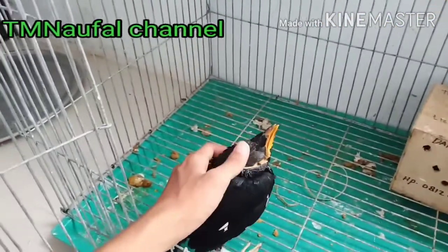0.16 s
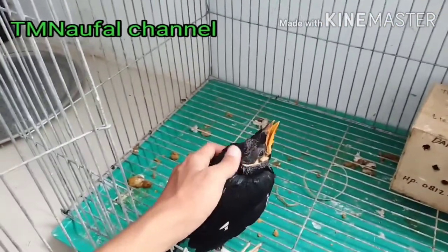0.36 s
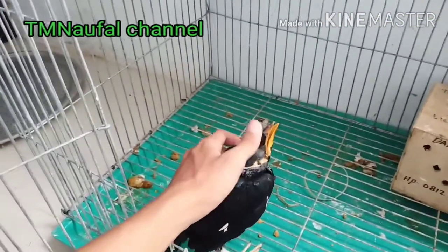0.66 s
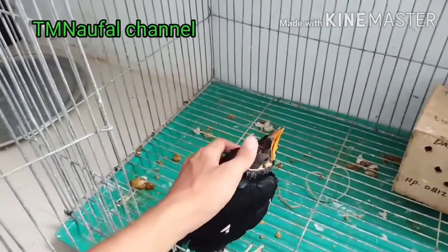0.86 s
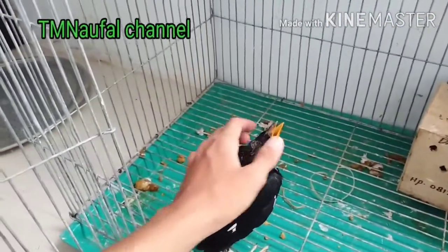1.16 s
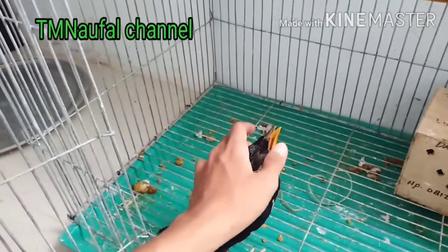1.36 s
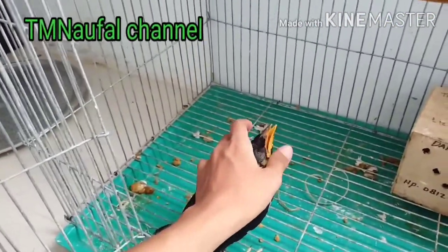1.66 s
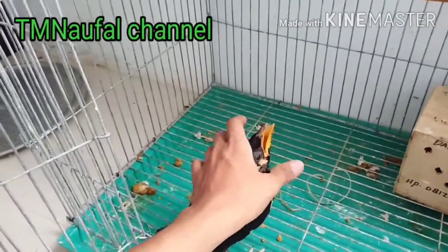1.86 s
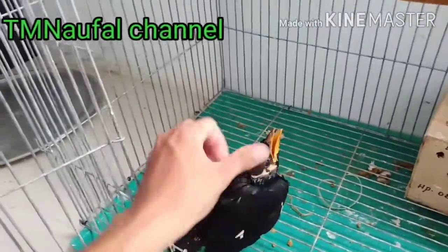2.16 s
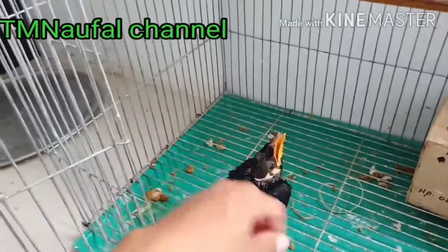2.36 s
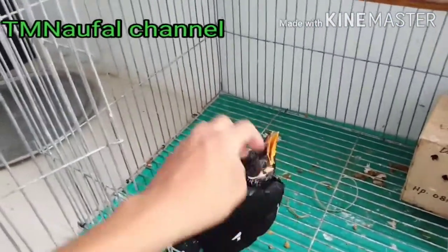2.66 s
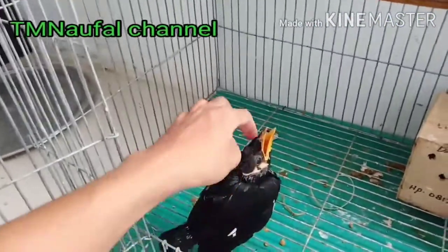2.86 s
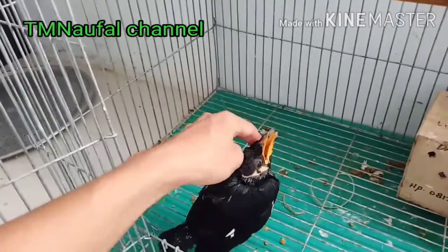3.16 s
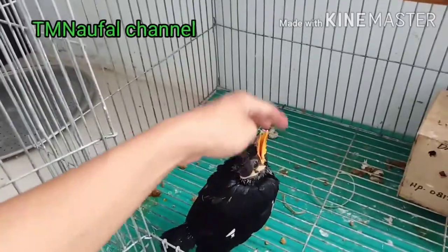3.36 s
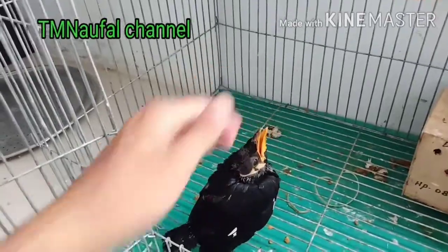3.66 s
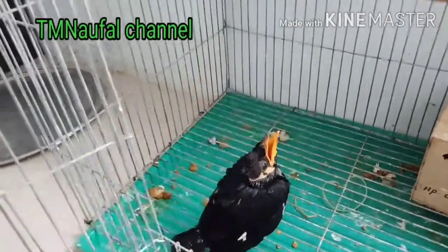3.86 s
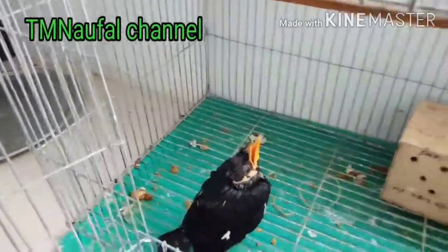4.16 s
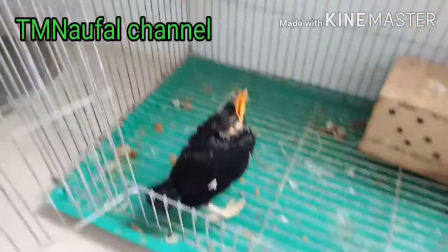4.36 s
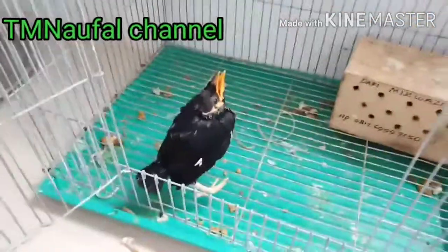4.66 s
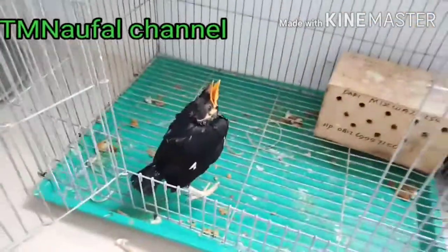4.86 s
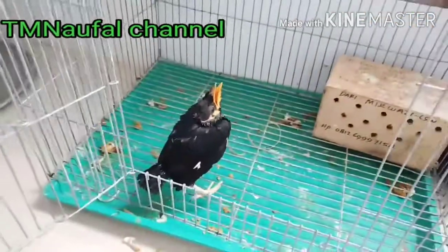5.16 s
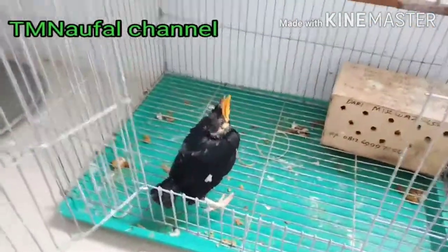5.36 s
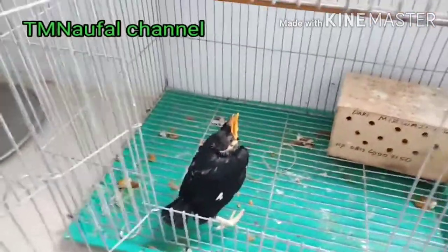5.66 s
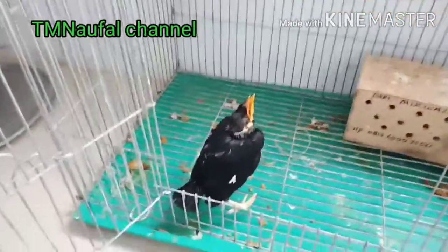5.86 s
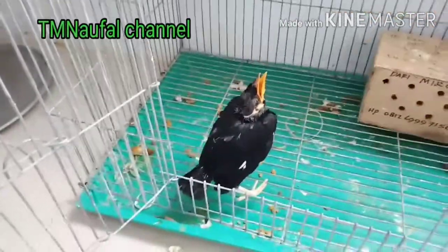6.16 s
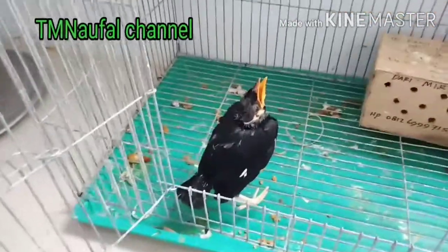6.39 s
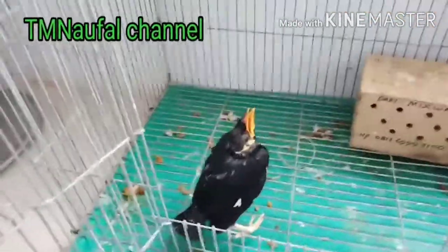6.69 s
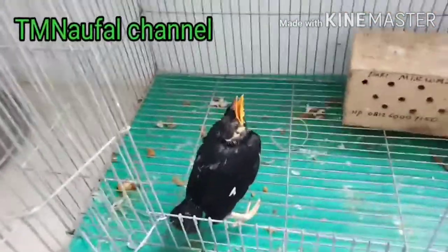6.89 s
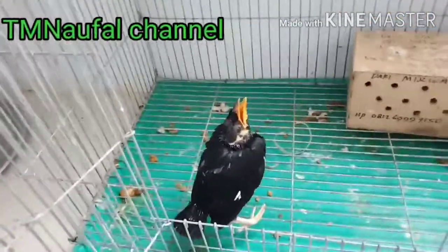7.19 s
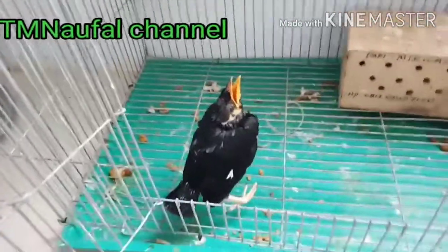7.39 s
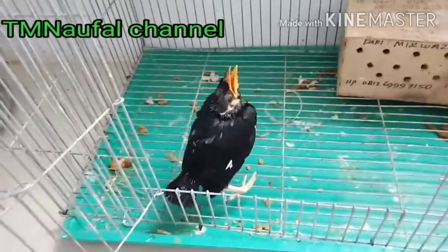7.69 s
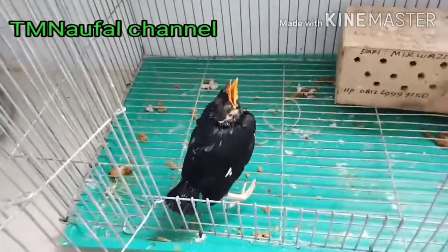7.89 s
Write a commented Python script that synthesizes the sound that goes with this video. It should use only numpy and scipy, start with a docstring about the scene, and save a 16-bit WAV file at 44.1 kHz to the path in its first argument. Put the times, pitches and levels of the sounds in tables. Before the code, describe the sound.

A young bird begs loudly and close by, eight hoarse squawks roughly one per second, each rising quickly to a piercing whistle and sagging into rasp. Soft handling rustles and dull bumps come early, with sharp wire ticks around two and a half and three seconds. Later calls are weaker and raspier. A small tiled room adds short, hard reflections over a very faint low hum, heard through a nearby phone microphone.

```python
"""Begging calls of a caged chick

A mynah chick begs eight times in a wire cage in a tiled room while a hand strokes its head.
Each call sums an arched harmonic whistle near 2 kHz and chaotic noise puffs, a harsh rasp;
the last calls are weaker and trail off in rasp alone. Decaying noise and modes make light ticks and
bumps on the cage, gliding partials short side notes and chirps, and shaped noise soft handling rustles.
Low noise and a faint hum lie beneath; decaying noise and close reflections form the room."""
import sys
import numpy as np
from scipy import signal
from scipy.fft import rfft, irfft, next_fast_len
from scipy.io import wavfile
from scipy.ndimage import uniform_filter1d, minimum_filter1d, map_coordinates

SR = 44100
rng = np.random.default_rng(int(sys.argv[2]) if len(sys.argv) > 2 else 0)


def log_audio(samples):
    """Write samples as a 16-bit WAV file to the path given in sys.argv[1]."""
    # one column per channel
    frames = np.atleast_2d(samples).T
    # limit to full scale, then quantise
    limited = np.clip(frames, -1, 1)
    pcm = np.round(limited * 32767).astype(np.int16)
    wavfile.write(sys.argv[1], SR, pcm)


N = 354123

# Levels in dB are relative: the filters, envelopes and room act on them afterwards.
# room noise, relative spectral density: frequency_hz, density_db
FLOOR_SPECTRUM = [(15, -64), (25, -36), (97, -6), (212, -22), (285, -16.5), (317, -18), (363, -22),
                  (451, -23), (887, -25), (1040, -31.5), (1370, -25.5), (1520, -46), (5140, -47.5),
                  (14800, -51), (16000, -49.5)]
# low rumble, relative spectral density: frequency_hz, density_db
RUMBLE_SPECTRUM = [(25, -18), (65, -5), (100, -2), (155, 0.0), (220, -19.0), (450, -20), (900, -33.5)]
# partials of the hum, about which the level wavers: frequency_hz, level_db
HUM_PARTIALS = [(97, -93), (285, -87.5), (430, -90)]
# soft handling rustles: start_s, length_s, level_db
RUSTLE_EVENTS = [(0, 0.12, -57), (0.122, 0.083, -66.5), (4.31, 0.62, -72.5), (5.79, 0.197, -76),
                 (5.849, .1, -67), (6.955, .1, -82.5)]
# colour of the rustle, relative spectral density: frequency_hz, density_db
RUSTLE_SPECTRUM = [(400, -5), (1200, -6), (2100, 0), (3100, 3), (4500, -2.5), (6500, 6), (8000, -8),
                   (15000, -26)]
# light taps and scuffs in the cage: start_s, tick_db, wire_db, tray_db
CONTACTS = [(0.072, -67, -61, -57.5), (1.701, -58.5, -40.5, -80), (2.441, -59, -57.5, -81.5),
            (2.462, -39, -55, -67), (2.469, -39.5, -33, -56.5), (2.509, -56, -56.5, -50),
            (2.532, -56.5, -58, -75), (3.088, -55, -54.5, -54.5), (3.153, -38, -19, -42),
            (3.262, -39, -62.5, -63), (3.288, -43, -49, -58.5), (3.297, -33, -37, -62),
            (5.884, -56, -80, -89), (5.893, -42, -68, -80), (6.788, -67, -53, -88.5), (6.81, -60, -58, -85)]
# colours of a tick and of the rattling wires: frequency_hz, density_db
TICK_SPECTRUM = [(1500, -24), (5000, -7.5), (7000, 2), (11000, -5), (16000, -6)]
WIRE_SPECTRUM = [(500, -18), (1100, 1.5), (2000, -1.5), (3200, -7), (6500, 1.5), (10000, -30.5)]
# modes of the floor tray, mean level: frequency_hz, level_db, t60_s
TRAY_MODES = [(295.6, -5, 0.23), (416, -10, .25), (612, -6, 0.13), (775, -8.5, 0.12)]
# dull bumps from handling: start_s, level_db, pitch_hz
BUMP_EVENTS = [(0.073, -56.5, 75.5), (.125, -61, 121), (.28, -58, 65.5), (.42, -65, 380), (.55, -63, 115),
               (.66, -70, 400), (0.822, -61, 105), (2.04, -65, 130), (2.5, -64, 300), (3.16, -56, 292),
               (3.349, -59, 140), (3.871, -50.5, 105), (4.63, -61.5, 290)]
# colour of a bump: multiple of its pitch (ratio), density_db
THUD_SPECTRUM = [(.25, -28), (.65, -9), (1, 0), (1.4, -7), (2.5, -24), (6, -60)]
# begging calls: start_s, length_s, crest_s (from the start), crest_hz, climb_hz (limit of the climb),
#   sag_s (width of the sag), rasp_db, swell_db, crescendo_db_per_s, release_s, whistle_db,
#   tilt_db (per harmonic), narrowing (of the beak, 0-1)
BEG_CALLS = [ (0.21, 0.45, 0.26, 2175, 87.8, 0.14, -33, 8, 7.5, 0.11, -24, -1.6, 0),
             (0.905, 0.47, 0.26, 2222, 430, 0.14, -34.5, 6.5, -5.5, 0.065, -21, 0.5, .03),
             (1.709, .53, 0.25, 2230, 103.5, 0.18, -33.5, 8, -3.5, 0.066, -21.5, -0.4, .03),
             (2.718, 0.52, 0.28, 2273, 156, .122, -34.5, 3.5, 7, 0.072, -20, 0.85, 0.45),
             (3.67, 0.48, .192, 2231, 165.7, .21, -35, 9, 4.5, .13, -21.5, 1.1, 0.6),
             (4.702, 0.55, .228, 2190, 129.8, .23, -35.5, 12.5, 6, 0.17, -23.5, 1, 0.43),
             (5.999, 0.69, 0.2, 2172, 87.7, 0.26, -34.5, 20, 1, 0.17, -27, 2, 0.66),
             (7.106, 0.57, 0.23, 2136, 40.1, 0.21, -36, 10.5, 10.5, 0.16, -26.5, 1, 0.7), ]
# throat and open beak, through which the first three harmonics glide: frequency_hz, gain_db
THROAT_RESONANCE = [(1750, -10.5), (1950, -11), (2150, -3), (2220, -5), (2290, -11.5), (3500, -12.5),
                    (3850, -3.5), (4200, -7), (4480, 3.5), (5300, -12), (5750, -8.5), (6150, 0), (6550, 0),
                    (6800, 0)]
# upper harmonics: multiple of the pitch (ratio), level_db against the third
UPPER_HARMONICS = [(4, -11), (5, -20), (6, -30)]
# rasp of a tense and of a slack syrinx, relative spectral density: frequency_hz, density_db
TENSE_SPECTRUM = [(700, -39), (860, -29.5), (1000, -4), (1250, -3.5), (1500, -2.5), (1800, -7.5), (2150, 1),
                  (2550, -7.5), (3000, 3), (5200, 3.5), (6350, 8), (7200, 0), (8600, -2), (12000, -14),
                  (15000, -13)]
SLACK_SPECTRUM = [(400, -40), (600, -25), (780, -21), (1000, -10.5), (1400, -2.5), (1950, 0.5),
                  (2380, -14.5), (3000, 3.5), (4000, -2), (6100, -1), (7800, -8), (9000, -17.5),
                  (12000, -25.5), (15000, -29.5)]
# blurred side partials of the chaotic syrinx: multiple of the pitch (ratio), relative level_db
SIDE_PARTIALS = [(.68, 1.5), (1.46, -1.5), (1.73, -7), (2.43, 3.5), (2.7, -5.5)]
# colour that a narrowed beak gives the rasp: frequency_hz, gain_db
NARROW_BEAK_RESONANCE = [(900, -2), (1500, -2.5), (2450, -0.5), (2800, 3.5), (3600, -1), (4500, 0.5),
                         (5150, 3), (6000, -2.5), (9000, -1), (14000, -2.5)]
# short side notes and chirps, faint to strong: start_s, length_s, start_hz, end_hz, level_db,
#   overtone_db (step per overtone)
SIDE_NOTES = [(0.951, 0.073, 1850, 1678, -25, -3.5), (3.429, 0.2, 1330, 1353, -75.5, -32.5),
              (4.35, 0.087, 1267, 1390, -61, -25.5), (4.553, 0.29, 1430, 1320, -67, -30.5),
              (6.664, 0.05, 1476, 1187, -42.5, -4), (6.815, 0.058, 4030, 4240, -64, -23),
              (7.743, 0.36, 3510, 3515, -62.5, -20)]
# nominal reverberation time, scattered from band to band: frequency_hz, t60_s
ROOM_DECAY = [(200, 0.55), (1000, 0.48), (2000, 0.47), (4000, 0.41), (6400, 0.38), (10000, .38),
              (15000, 0.11)]
# bands that linger in the cage after a sound: centre_hz, width_hz, boost_db
LINGERING_BANDS = [(2000, 63, 4.5), (2965, 300, 3), (6250, 320, 5)]

RUMBLE_DB = -73.5  # mean level of the steady low noise
RUSTLE_FADE_S = 0.018
START_HZ, SCOOP_S = 1850, .035  # slack pitch at which calls start; time constant of the scoop
CLIMB_S, SAG_HZ = .13, 565  # width of the climb; limit of the sag after the crest
CHAOS_HZ, TENSE_SPAN_HZ = 1818.4, 300  # after the crest: fully slack pitch; rise from it to full tension
CLIMB_TENSION = .85  # least tension (0-1) until the crest
SWELL_S, RELEASE_DB, RELEASE_CURVE = .055, 19, 1.35  # time constant, depth and exponent of the envelope
VOICE_ONSET_DB, VOICE_ONSET_S = 25.5, .056  # the whistle starts later than the rasp
BREAK_HZ, BREAK_DB_PER_HZ = 1910, 0.16  # below this pitch the whistle fades
WAVER_DB, WAVER_RATE = 1.3, 30  # waver of each harmonic alone: scale in dB, knots per s
GAPE_S = 0.029  # time constant of the opening beak
CEILING, LIMITER_S = .41, .002  # the phone's limiter: threshold, smoothing time
TOP_HZ = 15650  # middle of the phone's upper band edge


def amp(db):
    """Logarithmic level: amplitude gain is ten to the power of a twentieth of the decibels."""
    return 10 ** (np.asarray(db) / 20)


def unit(x):
    """Power normalisation: scale to rms 1."""
    return x / np.sqrt(np.mean(x ** 2) + 1e-20)


def along(points, hz):
    """Logarithmic frequency scale: read (Hz, value) points by interpolation."""
    f, v = np.transpose(points)
    return np.interp(np.log(hz + 1), np.log(f + 1), v)


def wobble(rate, size):
    """Slow random modulation: a smooth curve through random knots, rate knots a second."""
    knots = rng.standard_normal(int(size * rate / SR) + 4)
    return map_coordinates(knots, [np.arange(size) * rate / SR])


def coloured(x, spectrum):
    """Linear filtering: shape x by a (Hz, dB) spectrum, at rms 1."""
    m = next_fast_len(len(x) + 8192)
    gain = amp(along(spectrum, np.fft.rfftfreq(m, 1 / SR)))
    return unit(irfft(rfft(x, m) * gain, m)[:len(x)])


def noise(spectrum, size):
    """Random excitation: coloured Gaussian noise of rms 1."""
    return coloured(rng.standard_normal(size), spectrum)


def banded(x, depth_db, spacing_hz):
    """Irregular resonance: narrow random peaks and dips across the spectrum, new at each use."""
    knots = np.fft.rfftfreq(len(x), 1 / SR) / spacing_hz
    ripple = map_coordinates(rng.uniform(-1.5, 1, size=400), [knots], mode="mirror")
    return unit(irfft(rfft(x) * amp(depth_db * ripple), len(x)))


def add(track, s, x):
    """Superposition: mix x into the track from time s."""
    start = max(round(s * SR), 0)
    track[start:start + len(x)] += x[:N - start]


def in_room(x, wet_db, walls_db, count=10):
    """Reverberation: direct sound, close reflections off the tiles and an unevenly ringing tail."""
    hz, t, z = signal.stft(rng.standard_normal(SR * 2 // 3), SR, nperseg=512)
    t60 = along(ROOM_DECAY, hz) * amp(.7 * rng.uniform(-1, 1, len(hz)))
    ring_db = sum(db * np.exp(-((hz - centre) / width) ** 2) for centre, width, db in LINGERING_BANDS)
    decay = amp(ring_db[:, None] - 60 * t / t60[:, None])
    tail = signal.istft(z * decay, SR, nperseg=512)[1]
    response = amp(wet_db) * tail / np.linalg.norm(tail)
    delays = (rng.uniform(.002, .022, count) * SR).astype(int)
    response[delays] += amp(walls_db) * rng.standard_normal(count) / np.sqrt(count)
    response[0] = 1  # direct sound
    return signal.fftconvolve(x, response / np.linalg.norm(response))


def background():
    """Stationary sound: shaped low noise beneath a hum of wavering partials."""
    t = np.arange(N) / SR
    hum = np.zeros(N)
    for hz, db in HUM_PARTIALS:
        partial = unit(np.sin(2 * np.pi * hz * t + wobble(2.3, N)))
        hum += amp(db + 2.2 * wobble(5, N)) * partial
    rumble = amp(RUMBLE_DB + 1.1 * wobble(7.5, N)) * noise(RUMBLE_SPECTRUM, N)
    return hum + rumble + amp(-76.0) * noise(FLOOR_SPECTRUM, N)


def rustles():
    """Friction noise: soft handling rustles of shaped noise that fade in and out."""
    t = np.arange(N) / SR
    level = np.zeros(N)
    for s, length, db in RUSTLE_EVENTS:
        edge_distance = np.minimum(t - s, s + length - t)
        level += amp(db) * np.clip(edge_distance / RUSTLE_FADE_S + .5, 0, 1)
    rustle = banded(noise(RUSTLE_SPECTRUM, N), depth_db=6, spacing_hz=156)
    return level * amp(0.53 * wobble(36, N)) * rustle


def cage():
    """Impact and modal decay: a sharp tick, a short rattle of wires and a softer ring of the tray."""
    track, t = np.zeros(N), np.arange(SR // 2) / SR
    for s, tick_db, wire_db, tray_db in CONTACTS:
        tick = amp(tick_db - 60 * t / 0.052) * noise(TICK_SPECTRUM, len(t))
        rattle = banded(noise(WIRE_SPECTRUM, len(t)), depth_db=6.5, spacing_hz=157.0)
        wires = amp(wire_db - 60 * t / 0.033) * rattle
        tray = np.zeros(len(t))
        for hz, db, t60 in TRAY_MODES:
            mode_db = tray_db + db + rng.normal(0, 2)
            tray += amp(mode_db - 60 * t / t60) * np.sin(2 * np.pi * hz * t)
        contact = (tick + wires) * (1 - np.exp(-t / 0.00056)) + tray * (1 - np.exp(-t / 0.0024))
        add(track, s, in_room(contact, wet_db=-11, walls_db=-10.0))
    return track


def bumps():
    """Damped impact: each nudge is a soft, low thud of decaying noise without a ring."""
    track, t = np.zeros(N), np.arange(SR // 2) / SR
    for s, db, hz in BUMP_EVENTS:
        thud = noise([(k * hz, level) for k, level in THUD_SPECTRUM], len(t))
        add(track, s, thud * amp(db - 60 * t / .35) * (1 - np.exp(-t / 0.0093)))
    return track


def arch(t, crest_s, crest_hz, climb_hz, sag_s):
    """Pitch follows effort: a quick scoop, a climb to the crest and a long sag."""
    climb = climb_hz * (1 - np.exp(-((t - crest_s) / CLIMB_S) ** 2))
    sag = SAG_HZ * (1 - np.exp(-((t - crest_s) / sag_s) ** 2))
    aim = crest_hz - np.where(t < crest_s, climb, sag)
    return aim + (START_HZ - aim) * np.exp(-t / SCOOP_S)


def whistle(pitch, tension, harmonic_db, jitter=.0045, rough_jitter=.021, whistle_db=3.0, broken_db=-1.5):
    """Periodic voicing: a harmonic tone whose cycle length scatters more as the membranes slacken."""
    size = len(pitch)
    scatter = (jitter + rough_jitter * (1 - tension)) * wobble(700, size) + 0.0029 * wobble(60, size)
    phase = 2 * np.pi * np.cumsum(pitch * (1 + scatter)) / SR
    tone = sum(amp(db) * np.sin(k * phase) for k, db in enumerate(harmonic_db, 1))
    tone += sum(amp(harmonic_db[2] + db) * np.sin(round(k) * phase) for k, db in UPPER_HARMONICS)
    return tone * amp(whistle_db + broken_db * (2.5 - tension)), phase


def rasp(phase, tension, flutter_db=0.72, pulsing=0.32, tense_db=8.0, slack_db=4.0, blur=1.3, side_db=-7.0):
    """Chaotic vibration: noise puffs once per cycle; tension sets their colour and the side partials."""
    size = len(phase)
    puffs = rng.standard_normal(size) * (1 + pulsing * np.cos(phase)) * amp(flutter_db * wobble(450, size))
    puffs = banded(puffs, depth_db=5.5, spacing_hz=115)
    tense_air = amp(tense_db) * np.sqrt(tension) * coloured(puffs, TENSE_SPECTRUM)
    slack_air = amp(slack_db) * np.sqrt(1 - tension) * coloured(puffs, SLACK_SPECTRUM)
    sides = np.zeros(size)
    for k, db in SIDE_PARTIALS:
        level = amp(db + 3.0 * wobble(25, size))
        sides += level * np.sin(k * phase + blur * wobble(170, size))
    return tense_air + slack_air + amp(side_db) * np.sqrt(tension) * sides


def through_beak(air, narrowing):
    """Vocal-tract resonance: the narrower the beak, the more it colours the rasp."""
    narrowed = air.std() * coloured(air, NARROW_BEAK_RESONANCE)
    return air + np.clip(narrowing, 0, 1) * (narrowed - air)


def beg(length, crest_s, crest_hz, climb_hz, sag_s, rasp_db, swell_db, crescendo, release_s, voice_db,
        tilt_db, narrowing, opening=0.06, closed_hz=3600, attack_s=0.0079):
    """Source and filter: a syrinx clear while tense, chaotic as its pitch sags, sounds through the tract."""
    t = np.arange(round(length * SR)) / SR
    pitch = arch(t, crest_s, crest_hz, climb_hz, sag_s)
    pitch_tension = (pitch - CHAOS_HZ) / TENSE_SPAN_HZ
    tension = np.clip(np.maximum(pitch_tension, CLIMB_TENSION * (t < crest_s)), 0, 1)

    release = np.clip(1 - (length - t) / release_s, 0, 1)
    effort_db = crescendo * (t - crest_s) - RELEASE_DB * release ** RELEASE_CURVE
    rasp_level = rasp_db + effort_db - swell_db * np.exp(-t / SWELL_S)
    late_onset_db = VOICE_ONSET_DB * np.exp(-(t / VOICE_ONSET_S) ** 2)
    break_db = BREAK_DB_PER_HZ * np.maximum(BREAK_HZ - pitch, 0)
    voice_level = voice_db + effort_db - late_onset_db - break_db

    harmonic_db = []
    for k in range(1, 4):
        colour_db = along(THROAT_RESONANCE, k * pitch) + tilt_db * (k - 2)
        harmonic_db.append(voice_level + colour_db + WAVER_DB * wobble(WAVER_RATE, len(t)))
    tone, phase = whistle(pitch, tension, harmonic_db)
    # the beak opens at the start and closes again during the release
    air = through_beak(rasp(phase, tension), narrowing + release + np.exp(-t / GAPE_S))
    call = tone + amp(rasp_level) * air

    # the treble arrives late, as the throat opens
    muffled = signal.sosfiltfilt(signal.butter(2, closed_hz, fs=SR, output="sos"), call)
    call = muffled + np.clip(t / opening, 0, 1) * (call - muffled)
    return call * np.clip(t / attack_s, 0, 1) * np.clip((length - t) / 0.016, 0, 1)


def chick():
    """Position-dependent response: the bird shifts, so the room answers each call differently."""
    track = np.zeros(N)
    for s, *shape in BEG_CALLS:
        add(track, s, in_room(beg(*shape), wet_db=-10.0, walls_db=-12.5))
    return track


def side_notes(waver=0.013):
    """Frequency glide: short side notes and chirps, faint to strong, slightly hoarse, of four partials."""
    track = np.zeros(N)
    for s, length, start_hz, end_hz, db, overtone_db in SIDE_NOTES:
        size = int(length * SR)
        pitch = np.linspace(start_hz, end_hz, size) * (1 + waver * wobble(500, size))
        phase = 2 * np.pi * np.cumsum(pitch) / SR
        note = sum(amp(db + k * overtone_db) * np.sin((k + 1) * phase) for k in range(4))
        add(track, s, note * signal.windows.tukey(size, .8))
    return in_room(track, wet_db=-13, walls_db=-3.5)[:N]


def scene():
    """Superposition: all sources add at one microphone."""
    return (background() + rustles() + cage() + bumps() + chick() + side_notes())[None]


def record(dry):
    """Peak limiting and band limitation: the phone eases down high peaks and cuts the top treble."""
    span = max(int(LIMITER_S * SR), 2)
    needed = np.minimum(1, CEILING / (np.abs(dry) + 1e-9))
    gain = uniform_filter1d(minimum_filter1d(needed, 2 * span), span)
    limited = dry * gain
    m = next_fast_len(N + SR // 2)
    # a ramp 250 Hz wide, centred on the band edge
    band = np.clip((TOP_HZ - np.fft.rfftfreq(m, 1 / SR)) / 250 + .5, 0, 1)
    return irfft(rfft(limited, m) * band, m)[..., :N]


dry = scene()
out = record(dry)
log_audio(out)
```